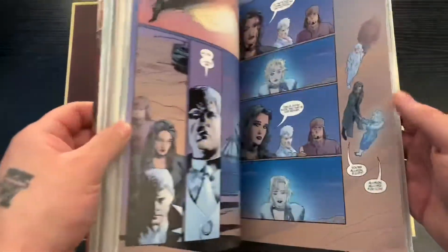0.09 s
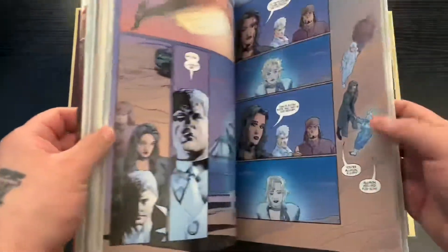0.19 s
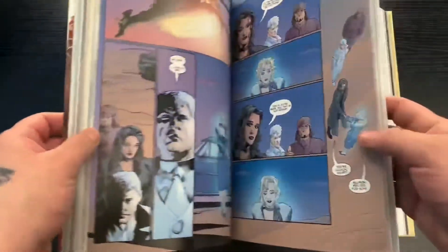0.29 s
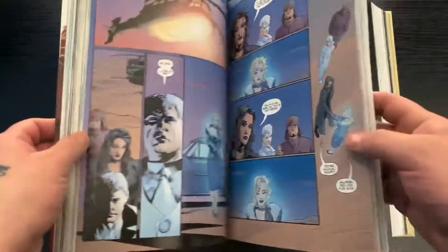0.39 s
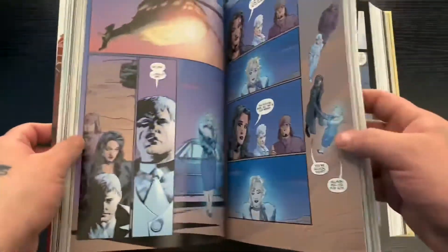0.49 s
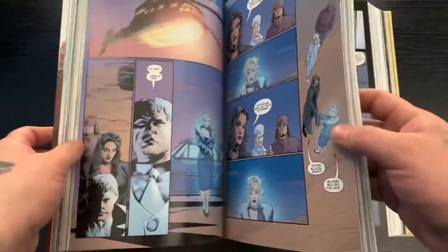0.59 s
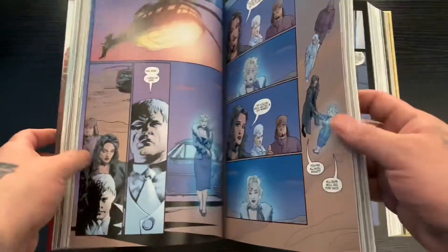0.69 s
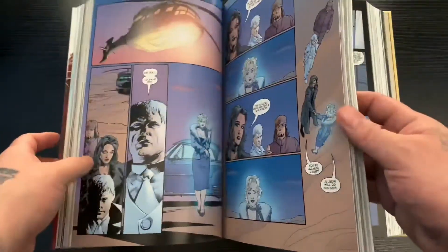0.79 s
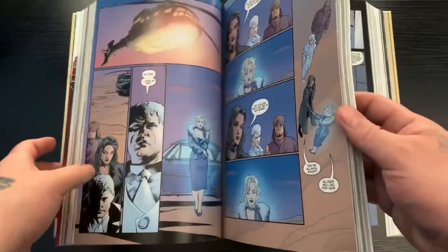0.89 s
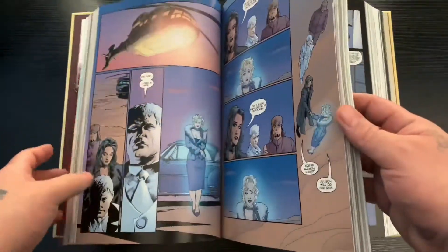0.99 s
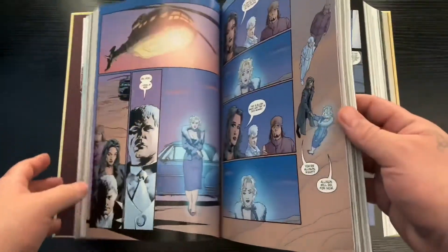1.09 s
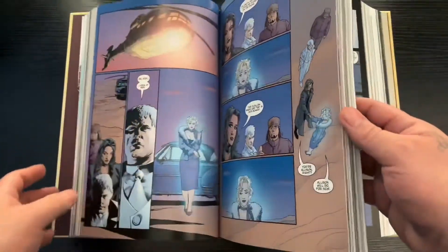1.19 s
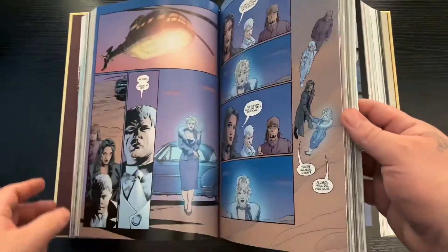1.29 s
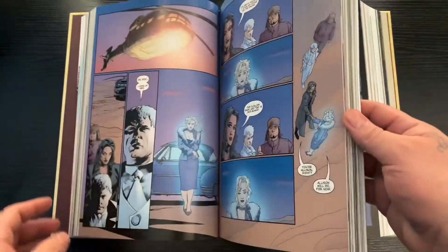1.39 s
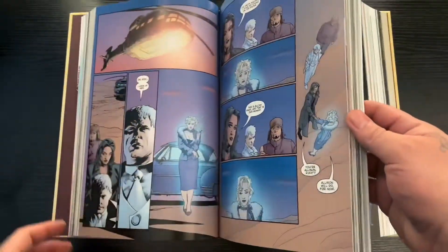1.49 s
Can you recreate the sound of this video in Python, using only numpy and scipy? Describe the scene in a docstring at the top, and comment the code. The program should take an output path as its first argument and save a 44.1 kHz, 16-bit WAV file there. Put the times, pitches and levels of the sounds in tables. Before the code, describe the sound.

A heavy hardcover book is handled close to a stereo microphone in a quiet room. After almost silent faint rustling, its cover knocks at 0.24, 0.31 and 0.35 seconds, dull, hollow and woody, with rebounds fading by 0.5. Soft finger strokes on glossy paper follow, with a light tick and tap at 0.7. Around 1.02-1.15, a brief low squeak, soft thump and brighter swishes, then faint low hum.

```python
"""Heavy book knocked and stroked

A heavy hardcover is held open on a desk in a quiet room, close to a pair of microphone ports.
The cover knocks in three close groups of contacts, some rebounds as strong as the first hit: short
pushes set book and desk ringing. Fingers slide on glossy paper (shaped noise), with soft dull rings
(fading sines); one slide squeaks low (a wavering tone with its octave). The book's low modes shake,
and a noise hum lies under it all."""
import sys
import numpy as np
from scipy import signal
from scipy.fft import rfft, irfft
from scipy.io import wavfile
from scipy.ndimage import uniform_filter1d

SR = 44100
rng = np.random.default_rng(int(sys.argv[2]) if len(sys.argv) > 2 else 0)


def ratio(d):
    """dB to gain"""
    e = np.asarray(d, float) / 20
    return 10 ** e


def wrap_up_sound(samples):
    """Save the sound to the file named by the first command line argument, as 16-bit audio."""
    columns = np.atleast_2d(samples).T
    # keep every value between -1 and 1, then stretch to whole-number steps
    tamed = np.clip(columns, -1, 1)
    steps = np.round(tamed * 32767).astype(np.int16)
    wavfile.write(sys.argv[1], SR, steps)


N = 66150
T = np.arange(N) / SR   # time of each sample in seconds

# The cover's knocks and rebounds.
# Each row: start in seconds, strength in dB, length of the contact in seconds.
KNOCK_CONTACTS = [(.2385, -12.5, 0.00078), (0.244, -16, 0.0011), (0.2548, -22, .001), (0.26, -33, 0.00074),
                  (0.2681, -40, 0.0013), (0.279, -45, 0.0018), (.3095, -18, 0.00067),
                  (0.3152, -12.5, 0.0012), (.338, -39, 0.00064), (.3535, -16.5, 0.00084),
                  (.3605, -19.5, 0.0024), (.381, -23, .001), (.401, -30.5, 0.0014), (.425, -44, 0.0018),
                  (.461, -29.5, 0.0031), (.485, -46, 0.0023), (.51, -60, 0.0017)]

# The ways in which book and desk ring when knocked (their modes).
# Each row: pitch in Hz, level alike in both ports in dB, level opposed between the ports in dB,
# time to fade by 60 dB in seconds.
BODY_MODES = [(66.8, -28.5, -35.5, 0.5), (117.5, -35, -38, 0.087), (134.8, -24.5, -47.5, 0.16),
              (181, -20.5, -36, 0.033), (301.6, -27, -39, 0.087), (393.4, -14.5, -34, .12),
              (503, -14, -30, 0.055), (513.3, -11, -24, .12), (550.5, -17, -15, 0.076),
              (637.6, -27.5, -9.5, 0.25), (833, -33.5, -35.5, 0.13), (1008, -36, -18.5, 0.11),
              (1127, -24.5, -30, 0.056), (1315, -13, -29.5, 0.027), (1560, -19.5, -30, 0.068),
              (1773, -23, -34, 0.068), (2450, -33.5, -27, .04)]


def rms_one(x):
    """Scale to unit rms (average strength 1)."""
    return x / np.sqrt(np.mean(x ** 2) + 1e-20)


def in_time(rows):
    """The columns of a table after its times, joined by straight lines."""
    s, *columns = np.transpose(rows)
    return [np.interp(T, s, column) for column in columns]


def coloured(x, spectrum):
    """Weight the frequencies of x by a spectrum and scale it to rms 1."""
    hz, db = np.transpose(spectrum)
    f = np.maximum(np.arange(N // 2 + 1) * SR / N, 1)
    gain = ratio(np.interp(np.log(f), np.log(hz), db))
    return rms_one(irfft(rfft(x) * gain, N))


def drift(rate):
    """Random wandering of rms 1; a higher rate in Hz wanders faster."""
    r = np.exp(-2 * np.pi * rate / SR)
    noise = rng.standard_normal(N + SR)   # the first second only settles the filter
    return rms_one(signal.lfilter([1], [1, -2 * r, r * r], noise)[SR:])


def ring(drive, hz, t60):
    """A resonance: a unit click starts a sine of height 1 that fades by 60 dB in t60 seconds."""
    r, w = ratio(-60 / (t60 * SR)), 2 * np.pi * hz / SR
    return signal.lfilter([0, np.sin(w)], [1, -2 * r * np.cos(w), r * r], drive + 1e-18)


def ports(alike, opposed):
    """Left and right from the alike and the opposed part."""
    return np.array([alike + opposed, alike - opposed])


def hum():
    """Low steady room noise, with separate noise for the alike and the opposed part."""
    # Each row of both spectra: frequency in Hz, relative level in dB per Hz.
    alike_spectrum = [(15, -38), (25, -5), (59, 3), (269, -11), (299, -16.5), (333, -10.5), (572, -15),
                      (955, -22), (1220, -12), (1470, -31), (1590, -21), (2520, -33), (8490, -53),
                      (11400, -52), (15800, -42)]
    opposed_spectrum = [(15, -75.5), (25, -33), (59, -10), (352, -9.5), (403, -18), (437, 2.5), (500, -13),
                        (1220, -10), (3300, -33.5), (14200, -44), (15800, -26)]
    alike = ratio(-60) * coloured(rng.standard_normal(N), alike_spectrum)
    opposed = ratio(-66) * coloured(rng.standard_normal(N), opposed_spectrum)
    return ports(alike, opposed)


def shake():
    """Hands shift the book: noise keeps its low modes trembling, at a level that varies."""
    # Strength of the shake. Each row: time in seconds, level in dB.
    shake_levels = [(0.0, -69.5), (0.078, -55), (0.142, -71), (0.216, -79), (0.238, -40), (0.258, -47.5),
                    (0.296, -53), (0.324, -40.5), (0.342, -42.5), (0.37, -37), (0.542, -61.5),
                    (0.768, -58.5), (0.852, -63.5), (0.926, -63.5), (0.952, -75), (0.986, -66), (1.01, -61),
                    (1.04, -50.5), (1.086, -42), (1.132, -67.5), (1.42, -64.5), (1.5, -77.5)]
    top_hz, damping, opposed_db = 320, 0.86, -34   # damping shortens the ring times
    db, = in_time(shake_levels)
    parts = []
    for _ in range(2):
        low = 0
        for hz, _, _, t60 in BODY_MODES[1:]:   # the lowest mode is left out
            if hz < top_hz:
                low = low + rms_one(ring(rng.standard_normal(N), hz, t60 * damping))
        parts.append(rms_one(low))
    return ratio(db) * ports(parts[0], ratio(opposed_db) * parts[1])


def friction_noise():
    """Skin on glossy paper: dense tiny slips of random strength, mixed with smooth hiss."""
    slips_per_s, slip_spread_db, slip_share = 2700, 3, 0.17   # share of the power
    ports_shared = 0.92   # power share of the opposed part taken from the alike part
    strength = ratio(slip_spread_db * np.minimum(rng.exponential(1, N), 5))
    slips = (rng.random(N) < slips_per_s / SR) * strength
    grains = rms_one(slips * rng.standard_normal((2, N)))
    hiss = rng.standard_normal((2, N))
    alike, own = np.sqrt(slip_share) * grains + np.sqrt(1 - slip_share) * hiss
    quarter_turn = -signal.hilbert(alike).imag   # the same noise shifted by a quarter cycle
    opposed = np.sqrt(ports_shared) * quarter_turn + np.sqrt(1 - ports_shared) * own
    return alike, opposed


def slide():
    """Friction noise coloured by paper and stroke; ticks and snaps make it louder briefly."""
    # Finger strokes. Each row: time in seconds, level in dB, brightness in dB per octave.
    strokes = [(0.0, -73, -1.5), (0.016, -69, -3.5), (0.086, -80.5, -5.5), (0.12, -70, -2),
               (0.166, -83.5, 0), (0.228, -66.5, -1.5), (0.242, -57, -5.5), (0.27, -69.5, -8),
               (0.296, -63.5, -0.5), (0.312, -65, -7.5), (0.346, -59.5, -1), (0.354, -60.5, -4),
               (0.43, -74, -4), (0.512, -63.5, 0.5), (0.592, -61, 2), (0.626, -74, -3), (0.664, -74.5, -1),
               (0.696, -54.5, 2), (0.83, -72.5, 2), (0.872, -73, -2), (0.956, -53.5, 2.5), (0.964, -63, -1),
               (0.994, -65.5, 1), (1.014, -64.5, -1), (1.022, -50, 1), (1.064, -47, 6), (1.118, -59.5, 2),
               (1.144, -53, 5.5), (1.182, -79, -2.5), (1.228, -85, 5), (1.302, -70, 3), (1.356, -85, 4.5),
               (1.5, -85, 5)]
    # The sheet rings in a band that moves with the stroke.
    # Each row: time in seconds, middle of the band in Hz, boost in dB.
    sheet_band = [(0, 4270, 9.5), (.2, 4600, 10.5), (.25, 5500, -2), (.38, 6200, -1), (.48, 4380, 7),
                  (.56, 4700, 10.5), (.61, 6650, 7.5), (.7, 6800, -1), (.75, 4340, 9), (.86, 4300, 7.5),
                  (.9, 5900, 7), (.935, 6260, 10.5), (.955, 4300, 11), (1.02, 4500, 8.5), (1.06, 6330, 4),
                  (1.15, 6170, 1.5), (1.5, 4800, -10)]
    # Colour of the paper noise. Each row of both: frequency in Hz, relative level in dB per Hz.
    alike_spectrum = [(410, -1.5), (700, -3), (1000, 1), (1280, 3.5), (2000, -5), (2600, -5.5),
                      (3050, -8.5), (3600, -7.5), (5000, -12.5), (6900, -10.5), (7800, -18.5), (8670, -24),
                      (9500, -13), (11000, -9), (12500, -15), (13500, -31), (14500, -18), (15500, -18.5),
                      (15900, -35)]
    opposed_spectrum = [(410, -22.5), (700, 4.5), (1020, 0.5), (1590, 4), (3670, -4), (4340, -10),
                        (6770, -11), (8560, -5.5), (10100, -10), (10800, -17.5), (13200, -9), (15000, -15),
                        (15800, -26)]
    opposed_db, flicker_db, patchy_db = -1, 0.5, 2.5
    ripple_db, ripple_hz, sheet_octaves = 2.5, 100, 0.22

    db, tilt = in_time(strokes)
    sheet_hz, sheet_db = in_time(sheet_band)
    alike, opposed = friction_noise()
    alike = coloured(alike, alike_spectrum)
    opposed = ratio(opposed_db) * coloured(opposed, opposed_spectrum)
    spectra = rfft(np.array([alike, opposed]))
    # a fine random ripple makes the colour of the paper noise uneven
    ripple = uniform_filter1d(rng.standard_normal(N // 2 + 1), size=int(ripple_hz * N / SR))
    spectra = spectra * rms_one(ratio(ripple_db * rms_one(ripple)))

    # Overlapping third-octave bands, counted from 400 Hz, each with its own patches.
    third = 3 * np.log2(np.arange(1, N // 2 + 2) * SR / N / 400)
    paper = 0
    for k in range(1, 18):
        hz = 400 * 2 ** (k / 3)
        near = np.exp(-0.5 * (np.log2(hz / sheet_hz) / sheet_octaves) ** 2)
        brightness_db = tilt * np.log2(hz / 6000)
        gain = ratio(brightness_db + sheet_db * near + patchy_db * drift(18.7))
        band = irfft(spectra * np.clip(1 - abs(third - k), 0, 1), N)
        paper = paper + gain * band
    level = ratio(db + flicker_db * drift(44)) + ticks() + paper_snaps()
    return ports(*(paper * level))


def soft_rings():
    """Soft dull rings: finger taps, then low thumps and the dying end of the squeak."""
    # Each row: start in seconds, level in dB, pitch in Hz, time to fade by 60 dB in seconds.
    ring_rows = [(0.228, -41, 496, 0.034), (.692, -42, 689, 0.075), (.697, -42.5, 488, 0.056),
                 (.838, -50, 490, 0.039), (0.929, -53, 473, 0.092), (.976, -42, 496, 0.035),
                 (1.022, -50, 650, 0.12), (1.026, -51.5, 950, 0.12), (1.04, -40.5, 231, 0.12),
                 (1.074, -42.5, 122.7, 0.11), (1.095, -60, 292, 0.043), (1.128, -48.5, 399, 0.064),
                 (1.15, -52, 474, 0.1)]
    rise_s, opposed_db = 0.0013, -12
    out = 0
    for s, db, hz, t60 in ring_rows:
        t = np.maximum(T - s, 0)
        envelope = ratio(db - 60 * t / t60) * (1 - np.exp(-t / rise_s))
        out = out + envelope * np.sin(2 * np.pi * hz * t)
    return ports(out, -ratio(opposed_db) * np.roll(out, 20))   # opposed part 20 samples later


def ticks():
    """Level curve of sharp ticks: cracks of the knocks and ticks of the paper."""
    # Each row: start in seconds, level in dB, time to fade by 60 dB in seconds.
    tick_rows = [(0.2381, -49, 0.011), (0.308, -56.5, 0.018), (0.354, -49.5, 0.014), (.688, -58, 0.027),
                 (.693, -52, 0.05), (.9, -68, 0.11), (.946, -65, 0.044), (1.02, -65, 0.045)]
    level = np.zeros(N)
    for s, db, t60 in tick_rows:
        level += ratio(db - 60 * np.maximum(T - s, 0) / t60) * (T > s)
    return level


def contact_pushes():
    """Each contact as a smooth push of its own length: its first sample and its shape."""
    pushes = []
    for s, db, contact in KNOCK_CONTACTS:
        i = int(s * SR)
        u = (T[i:i + 400] - s) / contact
        push = np.sin(np.pi * np.clip(u, 0, 1)) ** 2
        pushes.append((i, ratio(db) * push / push.sum()))
    return pushes


def push_train(pushes, change_db):
    """Lay all pushes along time, each made stronger or weaker by its change in dB."""
    drive = np.zeros(N)
    for (i, push), db in zip(pushes, change_db):
        drive[i:i + len(push)] += ratio(db) * push
    return drive


def knocks():
    """The pushes set every mode of book and desk ringing; each strike excites them unevenly."""
    spread_db = 1
    pushes = contact_pushes()
    change_db = rng.normal(0, spread_db, (len(pushes), len(BODY_MODES)))
    out = thud(pushes)
    for k, (hz, alike_db, opposed_db, t60) in enumerate(BODY_MODES):
        tone = ring(push_train(pushes, change_db[:, k]), hz, t60)
        quarter_turn = np.gradient(tone) * SR / (2 * np.pi * hz)   # a quarter cycle ahead
        alike = (-1) ** k * ratio(alike_db) * tone   # neighbouring modes have opposite signs
        out += ports(alike, ratio(opposed_db) * quarter_turn)
    return out


def thud(pushes):
    """Broad, dry resonance of the held cover: the pushes through a band filter."""
    low_hz, high_hz, level_db, opposed_db = 430, 614, -1, -17
    drive = push_train(pushes, np.zeros(len(pushes)))
    band = signal.butter(3, [low_hz, high_hz], "band", fs=SR, output="sos")
    out = signal.sosfilt(band, drive) * ratio(level_db) * SR / (high_hz - low_hz) / 2
    return ports(out, -ratio(opposed_db) * np.roll(out, 21))   # opposed part 21 samples later


def paper_snaps():
    """Level curve of the paper snap on each knock; shorter contacts snap harder."""
    snap_db, t60 = -37, 0.096
    level = np.zeros(N)
    for s, db, contact in KNOCK_CONTACTS:
        fade = ratio(db - 60 * np.maximum(T - s, 0) / t60) * (T > s)
        level += fade * (0.00045 / contact) ** 2
    return ratio(snap_db) * level


def squeak():
    """Skin sticks and slips on the cover, slower as it presses: an unsteady tone and its octave."""
    # Each row: time in seconds, pitch in Hz, level in dB before a lift of 3.5 dB.
    pitches = [(1.012, 483, -80), (1.024, 460, -48.5), (1.032, 455, -35.5), (1.04, 470, -44),
               (1.048, 417.6, -41.5), (1.068, 397.7, -49), (1.094, 412, -58.5), (1.1, 420, -56),
               (1.108, 423, -61)]
    jitter, flicker_db = 0.025, 1.2   # jitter is a fraction of the pitch
    octave_db, octave_follows, opposed_db = -14.5, 0.75, -10.5
    hz, db = in_time(pitches)
    turn = 2 * np.pi * np.cumsum(hz * (1 + jitter * drift(70))) / SR
    sounding = (T > pitches[0][0]) * (T < pitches[-1][0])
    level = ratio(db + 3.5 + flicker_db * drift(71)) * sounding
    octave = ratio(octave_db + octave_follows * (db - db.max()))   # weaker when the squeak is soft
    alike = np.sin(turn) + octave * np.sin(2 * turn)
    opposed = ratio(opposed_db) * np.cos(turn) + octave * np.cos(2 * turn)
    return level * ports(alike, opposed)


def room(x):
    """Dull decaying noise as the answer of the walls, its own on each side."""
    t60, wall_cut_hz = 0.22, 1400
    t = T[:SR // 2]
    tail = rng.standard_normal((2, len(t))) * ratio(-60 * t / t60) * (t > 0.008)
    tail = signal.sosfilt(signal.butter(1, wall_cut_hz, fs=SR, output="sos"), tail)
    tail = tail / np.sqrt(np.sum(tail ** 2, axis=1, keepdims=True))
    return signal.fftconvolve(x, tail, axes=1)[:, :N]


def scene():
    """Book and fingers, their answer from the room, and the hum."""
    book = shake() + slide() + soft_rings() + knocks() + squeak()
    room_db = -21
    return book + ratio(room_db) * room(book) + hum()


def low_pass(x):
    """Removes everything above the highest recorded frequency."""
    return signal.sosfilt(signal.butter(12, 15970, fs=SR, output="sos"), x)


def record(dry):
    """The microphone drops the deepest bass; the left port is slightly stronger."""
    low_cut_hz, left_over_right_db = 45.3, 0.27
    cut = signal.butter(3, low_cut_hz, "high", fs=SR, output="sos")
    balance_db = np.array([[left_over_right_db], [-left_over_right_db]]) / 2
    mix = signal.sosfilt(cut, dry) * ratio(balance_db)
    return low_pass(mix)


dry = scene()
out = record(dry)
wrap_up_sound(out)
```